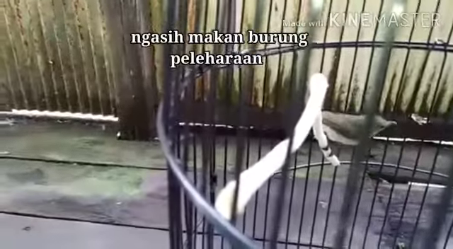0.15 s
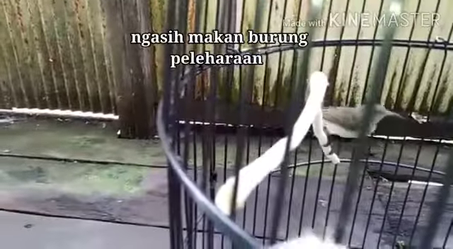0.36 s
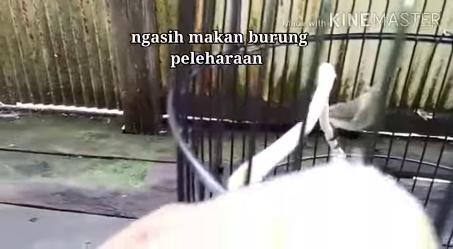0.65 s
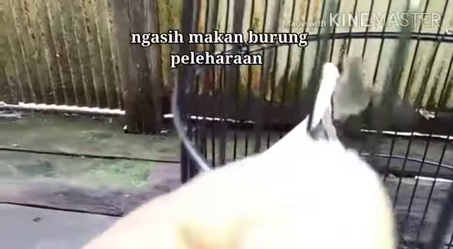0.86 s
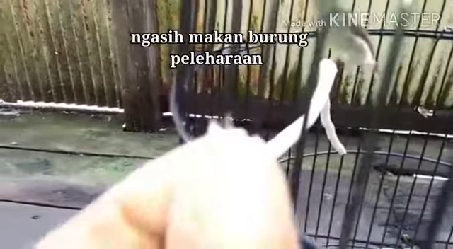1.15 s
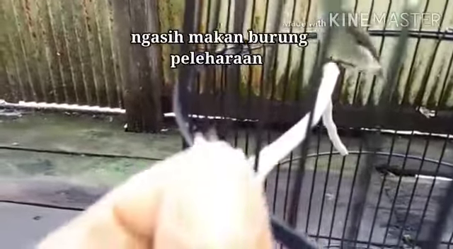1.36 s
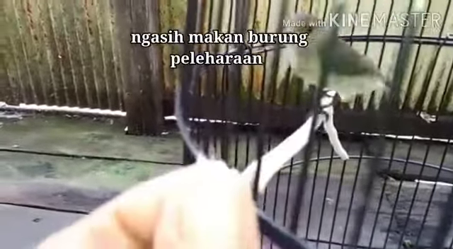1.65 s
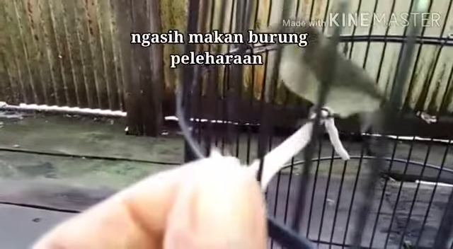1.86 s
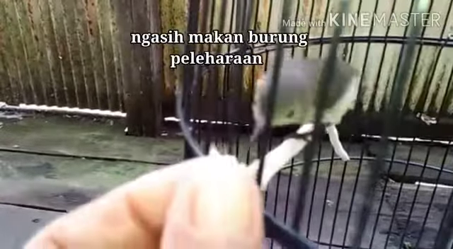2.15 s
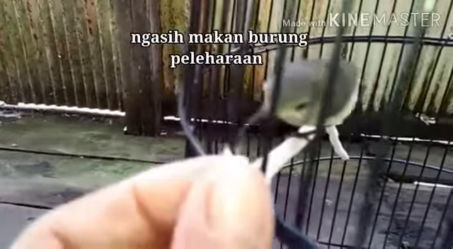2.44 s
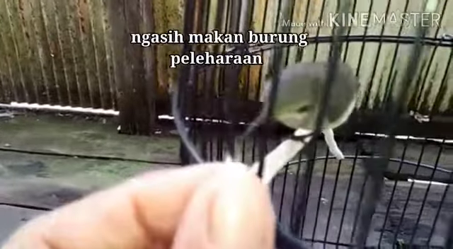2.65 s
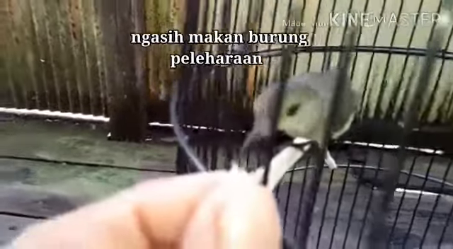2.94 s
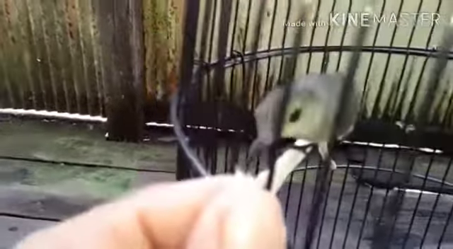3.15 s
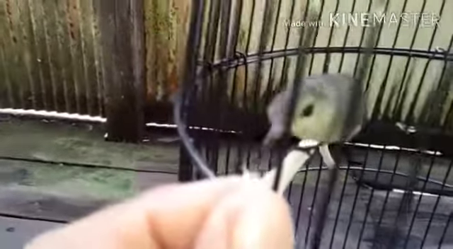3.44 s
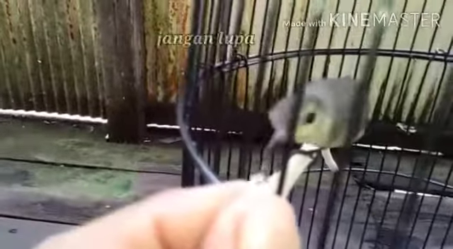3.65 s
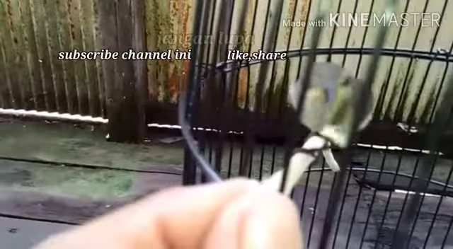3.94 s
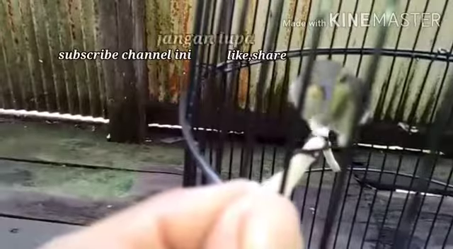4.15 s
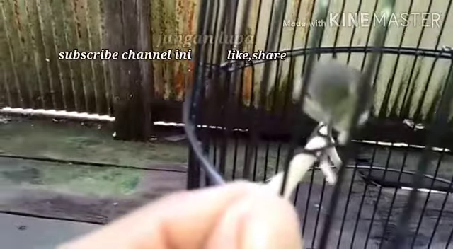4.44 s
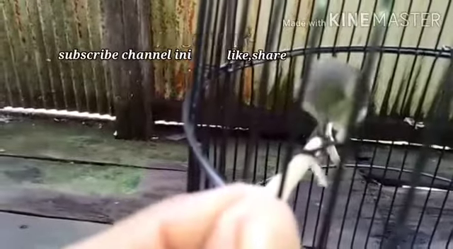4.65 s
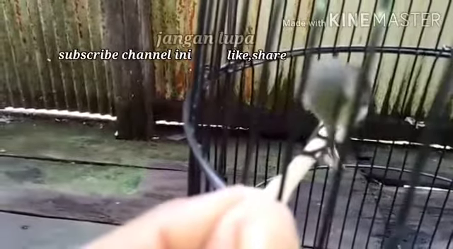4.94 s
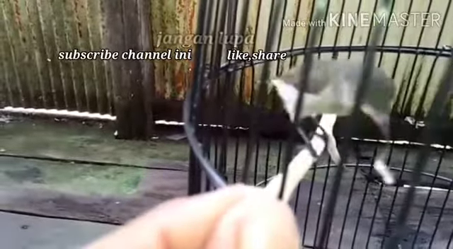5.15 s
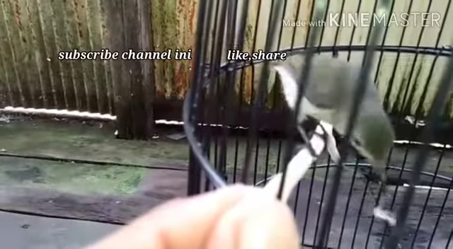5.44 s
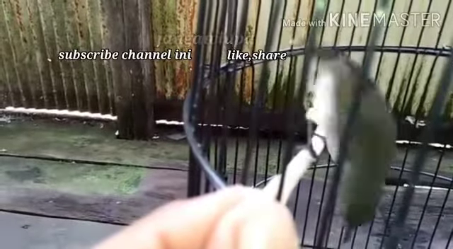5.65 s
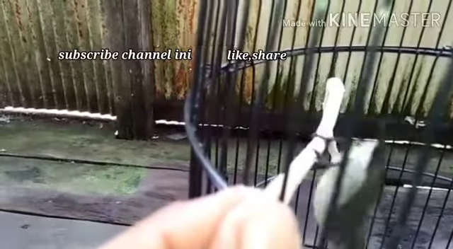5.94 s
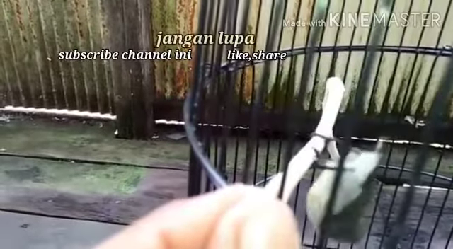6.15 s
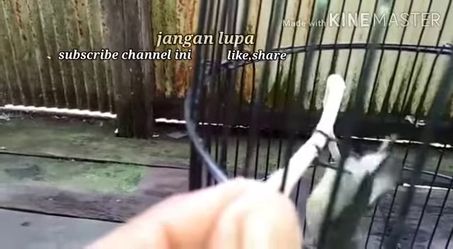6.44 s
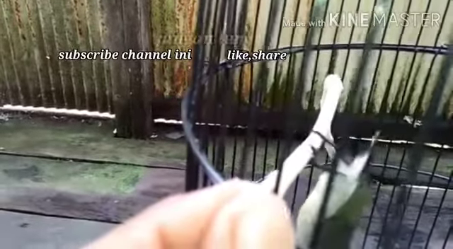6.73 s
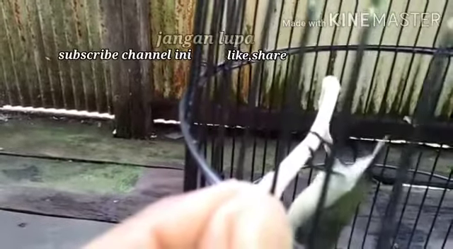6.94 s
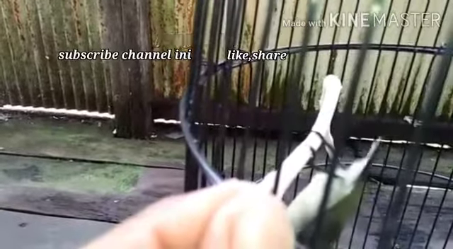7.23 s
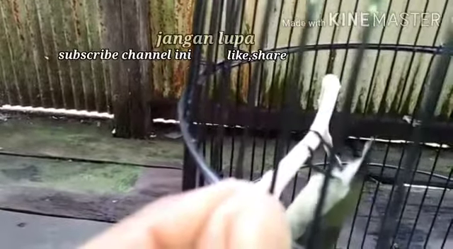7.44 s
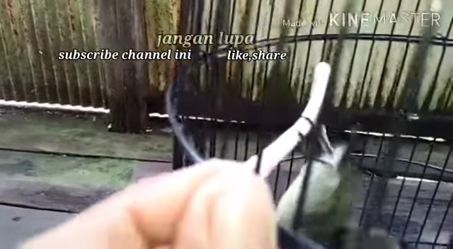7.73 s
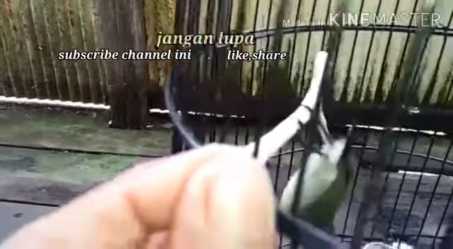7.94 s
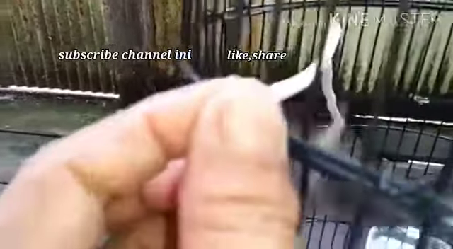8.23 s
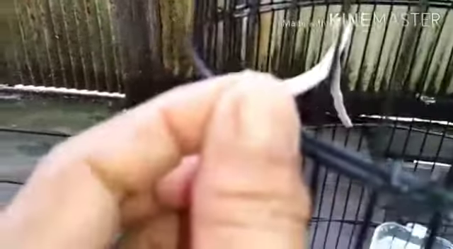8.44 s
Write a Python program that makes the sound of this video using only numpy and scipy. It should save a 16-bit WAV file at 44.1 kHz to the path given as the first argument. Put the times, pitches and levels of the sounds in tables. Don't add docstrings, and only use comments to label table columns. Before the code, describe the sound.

A small caged bird close by gives sharp, very high chirps, singly and in quick runs, with wing flicks, faint distant birds and a low street rumble.

```python
import sys
import numpy as np
from scipy import signal
from scipy.io import wavfile
from scipy.ndimage import uniform_filter1d, map_coordinates

SR = 44100
rng = np.random.default_rng(int(sys.argv[2]) if len(sys.argv) > 2 else 0)


def nominal_scale(level):
    x = np.asarray(level, float) / 20
    return 10 ** x


def waveform_to_disk(signal):
    frames = np.transpose(np.atleast_2d(signal))
    scaled = np.clip(frames, -1, 1) * 32767
    samples = np.round(scaled).astype(np.int16)
    wavfile.write(sys.argv[1], SR, samples)


N = 378378

# time in seconds, level in dB.
WIND_LEVEL = [
    (0, -60.5),
    (1.2, -73),
    (2.6, -66),
    (3.4, -70.5),
    (4.6, -68.5),
    (6.2, -59),
    (8.58, -57.5),
]
# frequency in Hz, density in dB per Hz.
WIND_SPECTRUM = [(12, -52.5), (20, -12), (86, 4), (172, -14.5), (247, -28.5), (271, -7.5), (300, -33.5),
                 (390, -40.5), (660, -120)]
# start in seconds, peak in dB, length in seconds.
GUSTS = [
    (4.824, -72, 0.17),
    (5.042, -41, 0.098),
    (4.913, -49, 0.17),
    (5.135, -35, 0.11),
    (5.3, -43.5, 0.21),
    (5.667, -54, 0.29),
    (8.501, -51, 0.077),
]
# start in seconds, peak in dB.
LIGHT_GUSTS = [(0.226, -49.5), (0.383, -57), (0.656, -47), (0.915, -56.5), (1.079, -50), (1.262, -53),
               (1.527, -56.5), (1.865, -58), (2.068, -54), (2.448, -52.5), (2.611, -48), (2.904, -57.5),
               (3.56, -60), (4.05, -53), (4.447, -62), (4.547, -55)]
LIGHT_GUST_S = .12

# time in seconds, level in dB.
TRAFFIC = [
    (0, -65),
    (2.1, -65),
    (3.3, -63),
    (4.7, -58.5),
    (6.3, -55.5),
    (7.8, -56),
    (8.58, -59),
]
# frequency in Hz, density in dB per Hz.
STREET_SPECTRUM = [(88, -37), (150, 2.5), (209, -19.5), (328, -5.5), (376, -26), (412, -14.5), (972, -6),
                   (1440, -13.5), (1600, -12.5), (4260, -30), (5500, -32), (7150, -48.5), (12100, -120)]
# frequency in Hz, width in Hz, level in dB.
MACHINES = [(159, 11, -75.5), (281.5, 12, -72), (445.3, 110, -68.5), (975, 76, -71), (1575, 55, -73),
            (2260, 55, -75.5)]
HUM_STEADY = 0.61
HUM_FOLLOWS = 0.91
# frequency in Hz, density in dB per Hz.
TYRE_SPECTRUM = [(760, -50.5), (1300, -16.5), (1740, 8.5), (2060, -5.5), (2180, 3.5), (2530, -25),
                 (3000, -7.5), (3900, -46), (6600, -120)]
FAR_TYRES_DB, BIKE_TYRES_DB = -71.5, -7

# frequency in Hz, density in dB per Hz.
LEAF_SPECTRUM = [(2060, -32.5), (3500, -4), (3780, -30.5), (4470, -29), (5180, -26), (7060, -4.5),
                 (8690, -2), (12100, -18.5), (14500, -18)]
LEAVES_DB, LEAVES_FOLLOW = -80.5, 0.5
SONG_STIR_DB = -15.5
RUSTLE_DB, RUSTLE_FOLLOWS, RUSTLE_SETTLE_S = -36.5, 0.52, 0.046

# time in seconds, whine in Hz, exhaust in dB, whine in dB.
BIKE = [(3.9, 2050, -93, -80), (4.15, 2032, -84, -52.5), (4.5, 2126, -88, -48.5), (5.3, 1895, -59, -53.5),
        (5.8, 1999, -103, -56), (6.28, 1914, -62, -56.5), (6.38, 1891, -55, -54.5), (6.45, 1834, -49, -64),
        (6.8, 1732, -45.5, -57), (7.1, 1709, -48.5, -50), (7.5, 1592, -51.5, -54), (8, 1460, -59.5, -58.5),
        (8.3, 1346, -56, -62.5), (8.58, 1255, -47, -67)]
# frequency in Hz, width in Hz, level in dB.
EXHAUST = [
    (60, 27, -5),
    (80.8, 12, -8.5),
    (126, 71, -2),
]
WHINE_PER_FIRING = 60.5

# frequency in Hz, level in dB, time of damping in seconds.
WIRE_MODES = [(5512, -30, 0.23), (8600, -7, .31), (9500, 0, 0.39), (13711, -8, .33)]
# time in seconds, level in dB.
WIRE_LEVEL = [
    (.06, -82),
    (.09, -64.5),
    (.2, -46),
    (.3, -54),
    (.4, -46),
    (.44, -64),
]
WIRE_GRAIN = .6

# start in seconds, length in ms, start in Hz, end in Hz, level in dB.
FAR_CALLS = [(0, 38, 2260, 2023, -54), (0.735, 130, 2560, 2300, -57), (1.522, 33, 4520, 3630, -60),
             (1.79, 210, 3260, 3160, -54.5), (2.019, 110, 3114, 3040, -51.5),
             (2.229, 210, 2964, 2970, -51.5), (1.888, 140, 3820, 4600, -49.5),
             (2.385, 103, 3890, 3400, -52.5), (2.474, 120, 2920, 2580, -48), (2.705, 50, 3110, 3200, -55),
             (2.72, 87, 3600, 3560, -65), (2.819, 190, 2865, 2960, -55), (2.9, 110, 2110, 2070, -60),
             (3.035, 86, 2127, 2156, -46), (3.15, 76, 2150, 2150, -52.5), (3.48, 68, 4000, 3280, -59),
             (3.583, 90, 2525, 2500, -49.5), (3.55, 100, 2230, 2240, -55), (3.675, 58, 7080, 4420, -55.5),
             (3.801, 133, 2985, 2906, -48.5), (4.02, 330, 1996, 1850, -50), (4.048, 320, 2455, 2556, -48.5),
             (4.25, 270, 2770, 2960, -57), (4.62, 260, 2980, 2995, -65), (8.29, 63, 2270, 2190, -53),
             (8.385, 31, 4960, 4500, -48), (8.4, 34, 2740, 2410, -52), (4.158, 160, 2540, 2680, -49),
             (4.899, 89, 5060, 5080, -56.5), (5.05, 160, 2194, 2090, -42), (5.07, 99, 5500, 5450, -49.5),
             (5.346, 51, 5550, 4050, -45.5), (5.7, 570, 2350, 2260, -57), (7.035, 44, 4800, 4880, -59),
             (7.25, 85, 3620, 3360, -49.5), (7.27, 102, 3250, 3060, -55), (7.4, 178, 2316, 2405, -55),
             (5.57, 60, 4760, 4670, -67), (5.4, 150, 4340, 4100, -66)]
# start in seconds, length in ms, start in Hz, end in Hz, level in dB.
COOS = [(0.298, 167, 1613, 1610, -57.5), (0.84, 360, 1587, 1544, -62), (0.83, 70, 645, 638, -55.5),
        (2.1, 193, 1134, 1072, -50), (3.27, 45, 853, 740, -57), (3.28, 48, 710, 620, -52.5),
        (3.45, 200, 1164, 1224, -50.5), (3.779, 130, 1324, 1240, -50.5), (4.148, 590, 943, 1193, -51.5),
        (4.879, 240, 1134, 1070, -45.5), (6.002, 196, 1390, 1330, -52), (6.711, 54, 1040, 907, -41.5),
        (6.72, 57, 760, 700, -51.5), (6.729, 66, 462, 428, -51)]
GLIDE_BEND = 1.5
# delay in ms, level in dB.
ECHOES = [(3.1, -10.5), (5.6, -13.5), (11.5, -11), (17, -16.5), (24, -14), (43, -30.5)]

# start in seconds, peak in dB,
# 60 dB decay in seconds.
RASPS = [(.0, -65, 0.11), (.085, -61, .5), (.15, -62, 0.6), (0.221, -60, 0.75), (1.03, -74.5, .1),
         (1.326, -88, .06), (1.103, -62, 0.07), (1.2194, -78, .08), (1.581, -53.5, 0.059),
         (2.729, -50.5, 0.17), (3.79, -76.5, 0.12), (4.0308, -59.5, 0.046), (4.1597, -30.5, 0.07),
         (5.471, -44.5, 0.29), (5.5137, -48.5, 0.17), (5.664, -38, 0.05), (6.443, -51, 0.12),
         (6.707, -43.5, 0.16), (6.749, -45, 0.18), (6.955, -49.5, 0.53), (7.161, -38.5, 0.06),
         (7.238, -61, .4), (7.32, -62, .2), (6.119, -29, .09), (6.148, -43, .09), (.44, -36, .09),
         (2.454, -51, .09), (2.02, -59.5, .4), (.6, -67, .6), (0.721, -62, 0.52), (.8, -64, 0.36),
         (.88, -76, 0.44), (3.499, -60, 0.31), (3.58, -66, 0.18), (3.7, -69.5, 0.34), (5.985, -47, 0.058),
         (7.674, -43.5, 0.071), (8.389, -52, .3), (6.471, -64, .2), (7.858, -52, .5), (8.034, -43, 0.37),
         (8.334, -48.5, 0.67), (8.3768, -54, 1), (8.453, -39.5, 0.2)]
RASP_HZ, RASP_SPREAD, RASP_RISE_MS = 8450, 0.04, 6.5
# start in seconds, peak in dB.
FLICKS = [(1.755, -43), (1.8506, -42), (1.947, -39.5), (1.994, -47.5), (2.425, -28.5), (5.958, -26.5),
          (3.05, -43), (3.536, -49.5), (3.684, -60), (5.351, -31), (5.571, -52), (5.704, -35),
          (5.795, -28.5), (6.8185, -33.5), (8.525, -47)]
FLICK_T60_S, FLICK_RISE_MS = 0.038, 5.1
# start in seconds, peak in dB.
KNOCKS = [(1.5843, -50.5), (1.7545, -46), (1.856, -53), (1.954, -46), (3.795, -52.5), (4.164, -35.5),
          (5.353, -68), (6.126, -50.5), (6.159, -53), (6.708, -52.5), (5.69, -50), (2.33, -54)]
KNOCK_HZ, KNOCK_T60_S, KNOCK_RISE_MS = 4340, 0.17, 2.4
TAP_HZ, TAP_DB, TAP_T60_S = 2500, 1, 0.046
BREATH_HZ, BREATH_DB, BREATH_T60_S, BREATH_RISE_MS, BREATH_LEAD_S = 7700, -6.5, 0.087, 8, 0.0005
CHIP_BREATH_DB, CHIP_BREATH_T60_S = -13, .15
DUET_BREATH_DB, DUET_BREATH_T60_S = -14.5, 0.21
INTAKE_DB, INTAKE_LEAD_S = -22.5, .013

# start in seconds, length in ms, start in Hz, end in Hz, level in dB.
CHIPS = [(1.202, 28, 4740, 4800, -55.5), (1.718, 29, 2430, 2483, -43.5), (1.757, 20, 2500, 2230, -48.5),
         (1.851, 25, 2895, 2675, -46.5), (1.914, 36, 4135, 4230, -37.5), (1.923, 27, 3940, 3670, -40),
         (1.946, 11, 2880, 2900, -43), (4.585, 87, 2228, 2382, -37.5), (4.341, 57, 2422, 2147, -44),
         (5.353, 27.1, 3236, 3634, -32), (5.475, 32, 3430, 3210, -40), (6.7, 30, 1990, 1936, -46),
         (6.811, 23.7, 3385, 3535, -36), (7.128, 26, 3870, 3530, -38), (8.332, 55, 2157, 2050, -43)]
# start in seconds, length in ms, start in Hz, end in Hz, level in dB.
PEEPS = [
    (1.177, 36, 3540, 3920, -64),
    (1.282, 13, 5100, 5120, -68),
    (1.321, 23, 5200, 5350, -64),
    (1.816, 28, 3810, 3520, -44.5),
    (4.988, 76, 3137, 2892, -35.5),
    (8.182, 22, 3830, 3690, -43),
    (8.198, 8.9, 3250, 3070, -41.5),
    (8.45, 23, 3580, 3750, -46),
    (8.47, 15, 3230, 3000, -47.5),
]
# start in seconds, length in ms, start in Hz, end in Hz, level in dB.
SHRILLS = [
    (8.028, 45, 1640, 1770, -43.5),
]
# frequency in Hz, gain in dB.
THROAT = [(1900, 1), (3300, -9.5), (4600, -0.5), (6600, 0), (8400, 8), (10000, -3), (11800, -8),
          (14000, -16)]
PEEP_HARMONICS_DB = [-7.5, -23, -16.5, -25.5, -58.5, -60, -60, -60]
CHIP_TILT_DB, SHRILL_TILT_DB = -1, 6.5
EFFORT_BRIGHTENS = 0.15

# start in seconds, length in ms, low end in Hz, high end in Hz, level in dB.
DUETS = [
    (2.892, 45.6, 4726, 6735, -27.5),
    (3.02, 37, 4630, 6250, -31),
    (3.047, 24.5, 4355, 6260, -28.5),
    (3.141, 50.4, 4475, 6507, -29.5),
    (3.374, 65.4, 4520, 6370, -32),
]
PRODUCTS = [(1, 0), (0, 1), (2, 0), (1, 1), (-1, 2), (0, 2), (3, 0), (-1, 1), (3, -1), (4, -1)]
PRODUCT_DB = [-10, 4.5, 1, -2, -6.5, -21, -20, -32, -24, -20]
LONG_RISE, SHORT_RISE = 0.11, -0.027

# start in seconds, length in ms, top in Hz, arch depth as a share of pitch,
# level in dB, manner.
WHISTLES = [(0.309, 35, 6950, 0.19, -22.5, "swoop"), (0.423, 41, 7010, 0.17, -19.5, "hoarse"),
            (2.297, 36.5, 7700, 0.15, -20.5, "hoarse"), (2.43, 51, 7000, 0.12, -22.5, "hoarse"),
            (4.214, 22.3, 8630, 0.073, -28.5, "arch"), (4.255, 11, 8540, 0.027, -23, "arch"),
            (4.282, 5.8, 8600, 0.013, -39.5, "arch"), (4.438, 18, 9750, 0.22, -26.5, "husky"),
            (4.483, 13, 10520, 0.071, -15.5, "climb"), (4.828, 23.5, 10300, 0.21, -20.5, "arch"),
            (4.868, 18, 10090, 0.32, -15.5, "climb"), (5.086, 21, 9840, 0.36, -21, "husky"),
            (5.131, 14.6, 9860, 0.29, -15.5, "climb"), (5.964, 34, 7140, 0.17, -21, "hoarse"),
            (6.119, 38.5, 5910, 0.1, -25, "husky"), (5.668, 12, 7800, 0.058, -45, "husky"),
            (5.797, 16, 7660, 0.018, -35, "husky"), (7.04, 14, 8580, 0.015, -50, "arch"),
            (7.651, 46.3, 7250, 0.17, -22, "swoop")]
MANNERS = {"hoarse": (0.27, 2.1, 1.6, 1.1, 930), "swoop": (0.2, 2.1, 1.6, .7, 900),
           "arch": (.33, 1.3, 2.9, .2, 1500), "climb": (0.98, .05, 1.9, 0.28, 530),
           "husky": (0.69, 0.22, 1.4, 0.55, 1200)}
OFF_TOP_DB = 42
HOARSE_BELOW_HZ, FOLD_HZ = 8200, 16000

STARVE_DB, STARVE_FLOOR_DB, STARVE_HOLD_S = 20, -48, .03


def unit(x):
    return x / np.sqrt(np.mean(x ** 2) + 1e-20)


def in_time(rows, outside=None):
    s, *columns = np.transpose(rows)
    return [np.interp(np.arange(N) / SR, s, c, outside, outside) for c in columns]


def at_hz(points, hz):
    known_hz, db = np.transpose(points)
    return np.interp(np.log(hz), np.log(known_hz), db)


def drift(rate, size=N):
    knots = rng.standard_normal(int(size / SR * rate) + 3)
    step = int(SR / rate / 12) + 1
    at = np.arange(0, size + step, step)
    smooth = map_coordinates(knots, [at / SR * rate], order=2, mode="nearest")
    return np.interp(np.arange(size), at, smooth)


def blur(width_hz, size):
    return (drift(width_hz, size) + 1j * drift(width_hz, size)) / np.sqrt(2)


def band_filter(x, order, hz, kind="low"):
    return signal.sosfilt(signal.butter(order, hz, kind, fs=SR, output="sos"), x)


def add(track, s, sound):
    i = max(round(s * SR), 0)
    track[i:i + len(sound)] += sound[:N - i]


def swell(size, rise, fall):
    u = np.linspace(0, 1, size)
    ramp = np.minimum(np.minimum(u / rise, (1 - u) / fall), 1)
    return u, np.sin(np.pi / 2 * ramp) ** 2


def glide(ms, start_hz, top_hz, end_hz, top_at, bend):
    u = np.linspace(0, 1, round(ms * SR / 1000))
    up = np.clip(1 - u / top_at, 0, 1)
    down = np.clip((u - top_at) / (1 - top_at), 0, 1)
    return top_hz + (start_hz - top_hz) * up ** 2.4 + (end_hz - top_hz) * down ** bend


def noise(spectrum, patchy_db):
    edges = 2 ** np.arange(np.log2(spectrum[0][0]), np.log2(spectrum[-1][0]) + .2, 1 / 3)
    white, together, out = rng.standard_normal((2, N)), drift(7.8), 0
    for k, (low, high) in enumerate(zip(edges, edges[1:])):
        if at_hz(spectrum, low) < -60:
            continue
        band = band_filter(white[k % 2], 2, [low, high], "band")
        flicker_db = patchy_db * (0.41 * together + drift(14))
        out = out + band * nominal_scale(at_hz(spectrum, np.sqrt(low * high)) + flicker_db)
    return unit(out)


def wind():
    level_db = in_time(WIND_LEVEL)[0] + 2.0 * drift(8.0) + 2.5 * drift(25)
    return nominal_scale(level_db) * noise(WIND_SPECTRUM, patchy_db=-1.5)


def gusts():
    out = np.zeros(N)
    low = unit(band_filter(rng.standard_normal(N), 2, [40, 130], "band"))
    for s, db, length in GUSTS + [(s, db, LIGHT_GUST_S) for s, db in LIGHT_GUSTS]:
        add(out, s - .02, nominal_scale(db - 3.5) * swell(round(length * SR), 0.31, 0.95)[1])
    return out * low


def hum():
    t, out = np.arange(N) / SR, 0
    for hz, width, db in MACHINES:
        tone = np.exp(2j * np.pi * hz * t) * (HUM_STEADY + blur(width, N))
        out = out + nominal_scale(db + 2 * drift(3.4)) * tone.real
    return out


def street(street_db, swing_db):
    return nominal_scale(street_db) * noise(STREET_SPECTRUM, patchy_db=3.5) + nominal_scale(HUM_FOLLOWS * swing_db) * hum()


def tyres():
    level = np.hypot(nominal_scale(FAR_TYRES_DB), nominal_scale(in_time(BIKE)[2] + BIKE_TYRES_DB))
    return level * noise(TYRE_SPECTRUM, patchy_db=3.0)


def rustle(stir, swing_db):
    r = np.exp(-1 / (RUSTLE_SETTLE_S * SR))
    power = signal.lfilter([1 - r], [1, -r], signal.lfilter([.002], [1, -.998], stir ** 2))
    steady = nominal_scale(LEAVES_DB + LEAVES_FOLLOW * swing_db)
    stirred = nominal_scale(RUSTLE_DB) * power ** (RUSTLE_FOLLOWS / 2)
    return np.hypot(steady, stirred) * noise(LEAF_SPECTRUM, patchy_db=1.5)


def motorbike():
    whine_hz, exhaust_db, whine_db = in_time(BIKE)
    firings_per_s = whine_hz / WHINE_PER_FIRING
    turns = np.cumsum(firings_per_s * (1 + 0.012 * drift(17))) / SR
    fired = np.diff(np.floor(turns), prepend=0)
    pulses = band_filter(fired * nominal_scale(3 * drift(30)) + 1e-18, 4, 175)
    pipe = 0
    for hz, width, db in EXHAUST:
        r = np.exp(-np.pi * width / SR)
        resonator = [1, -2 * r * np.cos(2 * np.pi * hz / SR), r * r]
        pipe = pipe + nominal_scale(db) * unit(signal.lfilter([1, 0, -1], resonator, pulses))
    drone = np.sin(3 * 2 * np.pi * turns) * nominal_scale(1 + 1.5 * drift(8))
    whine = (np.exp(2j * np.pi * np.cumsum(whine_hz) / SR) * blur(110, N)).real
    whine *= nominal_scale(whine_db + 2.5 * drift(6))
    return ((unit(pipe) + drone) * nominal_scale(exhaust_db) + whine) * (np.arange(N) > BIKE[0][0] * SR)


def wire():
    size = SR // 2
    level_db = in_time(WIRE_LEVEL, outside=-120)[0][:size]
    t, modes, out = np.arange(size) / SR, 0, np.zeros(N)
    for hz, db, end in WIRE_MODES:
        level = nominal_scale(db + 1.7 * drift(25, size) - 350 * np.maximum(t - end, 0))
        modes = modes + level * (np.exp(2j * np.pi * hz * t) * (1 + WIRE_GRAIN * blur(120, size))).real
    out[:size] = np.sqrt(2) * nominal_scale(level_db) * modes
    return out


def far_birds():
    out = np.zeros(N)
    for s, ms, start_hz, end_hz, db in FAR_CALLS + COOS:
        u, shape = swell(round(ms * SR / 1000), .25, .45)
        hz = end_hz + (start_hz - end_hz) * (1 - u) ** GLIDE_BEND
        smear = .2 + blur(max(hz[0] * .065, 110), len(u))
        note = np.exp(2j * np.pi * np.cumsum(hz) / SR) * smear
        add(out, s, nominal_scale(db + 2.0 * drift(11.0, len(u))) * shape * unit(note.real) * .58)
    return out


def walls(x, early_db, early_t60, late_db, late_t60, dull_hz, thin_hz):
    t = np.arange(SR * 3 // 4) / SR
    white = rng.standard_normal((2, len(t)))
    response = nominal_scale(early_db - 60 * t / early_t60) * white[0] * np.minimum(t / 0.0051, 1)
    response += nominal_scale(late_db - 60 * t / late_t60) * white[1] * np.minimum(t / 0.046, 1)
    response = band_filter(response, 2, thin_hz, "high")
    for ms, db in ECHOES:
        response[round(ms * SR / 1000)] += nominal_scale(db)
    response = band_filter(response, 1, dull_hz)
    return x + signal.fftconvolve(x, response)[:N]


def puffs():
    out = []
    for s, _, hz, _, db, _ in WHISTLES:
        if hz < HOARSE_BELOW_HZ:
            breath_hz = BREATH_HZ * min(hz / 7000, 1)
            out.append((s - BREATH_LEAD_S, db + BREATH_DB, breath_hz, BREATH_T60_S, BREATH_RISE_MS))
            out.append((s - INTAKE_LEAD_S, db + INTAKE_DB, RASP_HZ, .2, BREATH_RISE_MS))
    for s, *_, db in CHIPS + SHRILLS:
        out.append((s + 0.01, db + CHIP_BREATH_DB, RASP_HZ, CHIP_BREATH_T60_S, RASP_RISE_MS))
    for s, *_, db in DUETS:
        out.append((s + 0.0079, db + DUET_BREATH_DB, RASP_HZ, DUET_BREATH_T60_S, BREATH_RISE_MS))
    out += [(s, db, RASP_HZ, t60, RASP_RISE_MS) for s, db, t60 in RASPS]
    out += [(s, db, RASP_HZ, FLICK_T60_S, FLICK_RISE_MS) for s, db in FLICKS]
    for s, db in KNOCKS:
        out.append((s, db, KNOCK_HZ, KNOCK_T60_S, KNOCK_RISE_MS))
        out.append((s, db + TAP_DB, TAP_HZ, TAP_T60_S, KNOCK_RISE_MS))
    return out


def rasps():
    out, t = np.zeros(N), np.arange(SR // 4) / SR
    for s, db, hz, t60, rise_ms in puffs():
        hz *= np.exp(RASP_SPREAD * rng.standard_normal())
        air = band_filter(rng.standard_normal(len(t)), 4, hz * 0.53, "high")
        hump = band_filter(air, 2, [hz * 0.79, min(hz * 1.196, 18000)], "band")
        grain_hz = hz * rng.uniform(0.66, 1.3) * np.array([.97, 1.03])
        grain = unit(band_filter(air, 1, grain_hz, "band"))
        rise = 2.7 * rise_ms / 1000
        shape = np.minimum(t / rise, 1) ** 1.6 * nominal_scale(-60 * np.maximum(t - rise - .006, 0) / t60)
        level = nominal_scale(db + 3 + 2.5 * drift(180, len(t)))
        add(out, s - 0.41 * rise, level * shape * (0.2 * air + hump + 0.2 * grain))
    return out


def chips():
    out, k = np.zeros(N), np.arange(1, 9)[:, None]
    voices = [(CHIPS, 1, CHIP_TILT_DB * np.log2(k)),
              (PEEPS, 0, np.array(PEEP_HARMONICS_DB)[:, None]),
              (SHRILLS, 1, SHRILL_TILT_DB * np.log2(k))]
    for table, throat, voice_db in voices:
        for s, ms, start_hz, end_hz, db in table:
            u, shape = swell(round(ms * SR / 1000), .45 if ms > 64 and not throat else .22, .35)
            bend = 2.6 if end_hz > start_hz and ms < 35 else 1.6
            hz = end_hz + (start_hz - end_hz) * (1 - u) ** bend
            phase = 2 * np.pi * np.cumsum(hz * (1 + 0.008 * drift(180, len(u)))) / SR
            flutter = 1 + 0.5 * np.array([blur(400, len(u)) for _ in k])
            evenness = np.sqrt(np.mean(abs(flutter) ** 2, axis=1, keepdims=True))
            flutter *= shape ** (EFFORT_BRIGHTENS * (k - 1)) / evenness
            level = nominal_scale(throat * at_hz(THROAT, k * hz) + voice_db) * (k * hz < 14600)
            stack = unit((level * (flutter * np.exp(1j * k * phase)).real).sum(axis=0))
            add(out, s, nominal_scale(db) * shape * stack * (1 + 0.021 * rng.standard_normal(len(u))))
    return out


def duets():
    out = np.zeros(N)
    for s, ms, low_hz, high_hz, db in DUETS:
        rise = LONG_RISE * min(50 / ms, 1) if ms > 37 else SHORT_RISE
        u, shape = swell(round(ms * SR / 1000), 0.42, 0.062)
        short = rise * np.clip(1 - u / 0.55, 0, 1) ** 1.6
        low = 2 * np.pi * np.cumsum(low_hz * (1 - short + 0.0061 * drift(248.0, len(u)))) / SR
        high = 2 * np.pi * np.cumsum(high_hz * (1 - short + 0.0031 * drift(300, len(u)))) / SR
        tones = 0
        for (a, b), tone_db in zip(PRODUCTS, PRODUCT_DB):
            tone = np.exp(1j * (a * low + b * high)) * (1 + 1.1 * blur(419, len(u)))
            tones = tones + nominal_scale(tone_db) * tone.real
        add(out, s, nominal_scale(db) * shape * unit(tones) * (1 + 0.04 * rng.standard_normal(len(u))))
    return out


def whistles():
    out = np.zeros(N)
    for s, ms, top_hz, depth, db, manner in WHISTLES:
        top_at, fall, bend, rough, width_hz = MANNERS[manner]
        start_hz, end_hz = top_hz * (1 - depth), top_hz * (1 - depth * fall)
        hz = glide(ms, start_hz, top_hz, end_hz, np.clip(top_at, .1, .9), bend)
        u, shape = swell(len(hz), .34 if manner == "hoarse" else .26, .2)
        phase = 2 * np.pi * np.cumsum(hz * (1 + 0.0052 * drift(380, len(u)))) / SR
        mirror = 2 * np.pi * FOLD_HZ * np.arange(len(u)) / SR - phase
        tone = (np.exp(1j * phase) * (1 + rough * blur(width_hz, len(u)))).imag
        octave = (np.exp(2j * phase) * blur(900, len(u))).imag
        tone += nominal_scale(-17.5) * (hz < 7400) * octave
        tone += nominal_scale(-40) * (hz > 9000) * np.sin(mirror)
        shape = shape * nominal_scale(OFF_TOP_DB * (hz / top_hz - 1))
        level = np.sqrt(2) * nominal_scale(db) * np.sqrt(np.mean(shape ** 2))
        add(out, s, level * unit(shape * tone * nominal_scale(2.5 * drift(400, len(u)))))
    return out


def scene():
    street_db = in_time(TRAFFIC)[0]
    swing_db = street_db - street_db.mean()
    stir, song = rasps(), whistles()
    air = wind() + street(street_db, swing_db) + tyres()
    air += rustle(stir + nominal_scale(SONG_STIR_DB) * song, swing_db)
    lows = band_filter(motorbike() + gusts(), 2, 45, "high")
    far = nominal_scale(-4) * walls(far_birds(), early_db=-27, early_t60=.25, late_db=-31, late_t60=.6,
                          dull_hz=6000, thin_hz=100)
    near = walls(song + chips() + duets() + stir, early_db=-32.5, early_t60=0.19,
                 late_db=-38.0, late_t60=0.35, dull_hz=9000, thin_hz=4800)
    return (near + far + wire() + lows + air)[None]


def starve(x):
    top = signal.sosfiltfilt(signal.ellip(7, .3, 40, 10850, "high", fs=SR, output="sos"), x)
    note = band_filter(x, 4, [9300, 10800], "band")
    size = round(STARVE_HOLD_S * SR)
    note_power, top_power = (uniform_filter1d(v ** 2, size, origin=size // 3) for v in (note, top))
    excess = note_power / (top_power * nominal_scale(2 * STARVE_DB) + nominal_scale(2 * STARVE_FLOOR_DB))
    return x - top * excess ** 2 / (1 + excess ** 2)


def roll_off(x):
    return signal.sosfilt(signal.butter(12, 15440, fs=SR, output="sos"), x)


def record(dry):
    cut = signal.sosfilt(signal.ellip(10, .5, 50, 14250, fs=SR, output="sos"), starve(dry))
    return roll_off(cut)


dry = scene()
out = record(dry)
waveform_to_disk(out)
```